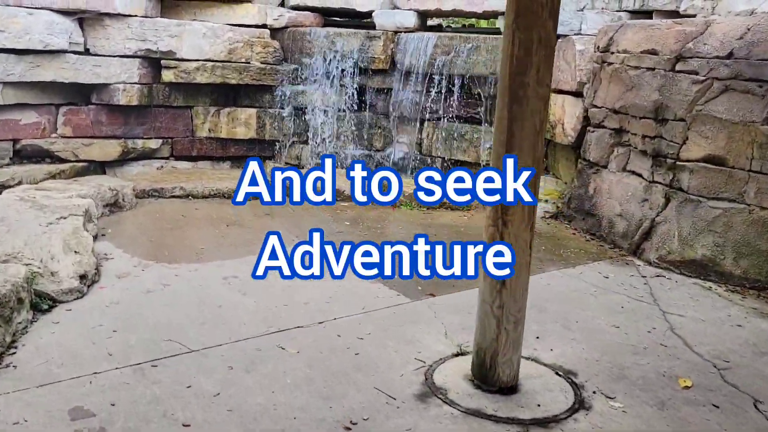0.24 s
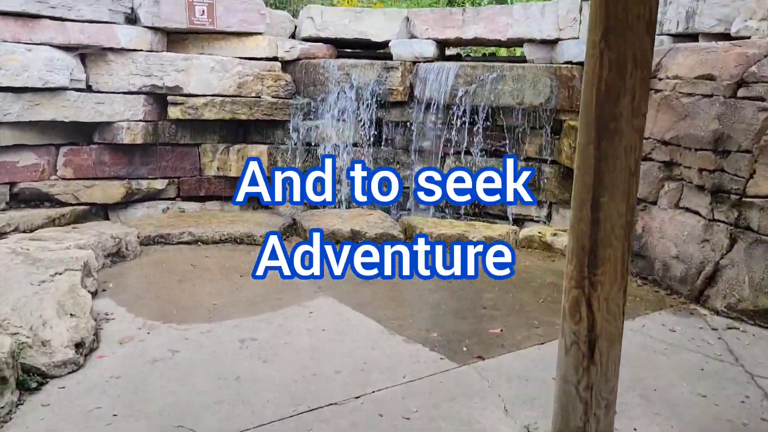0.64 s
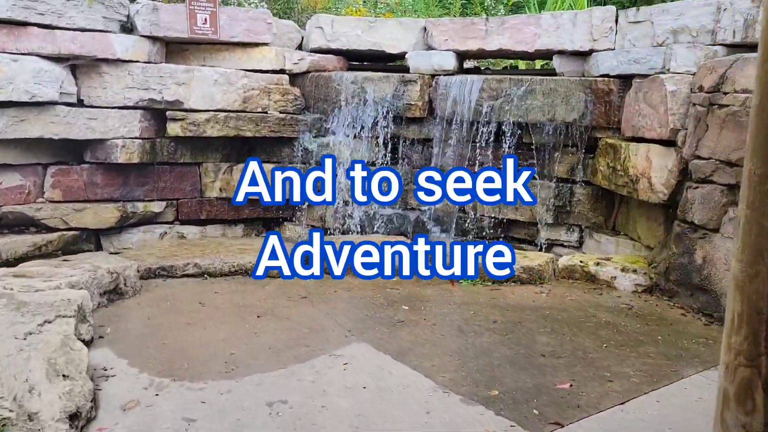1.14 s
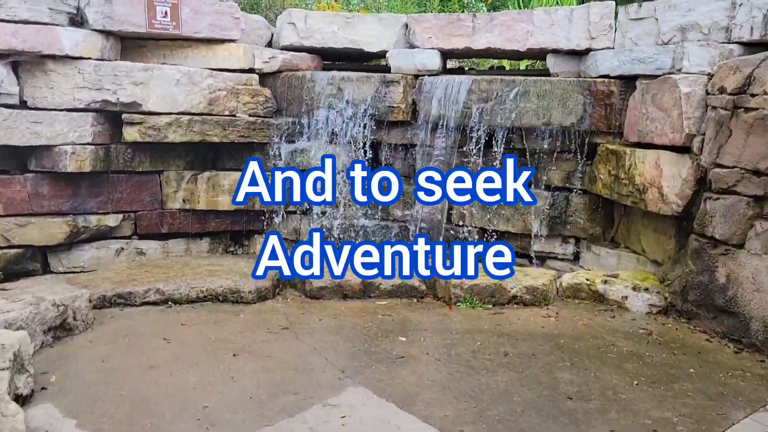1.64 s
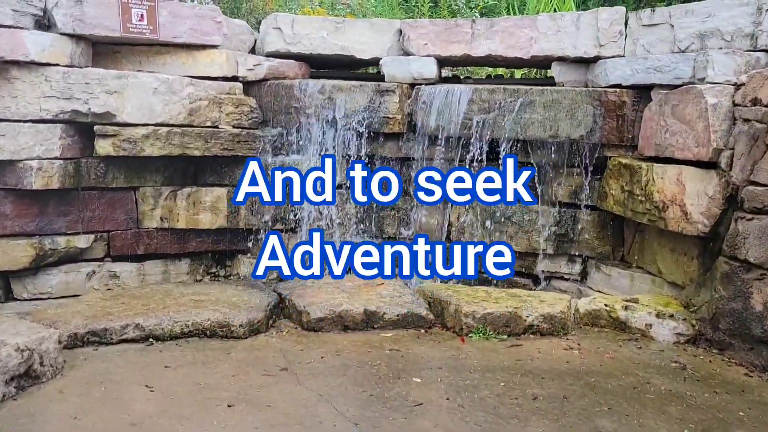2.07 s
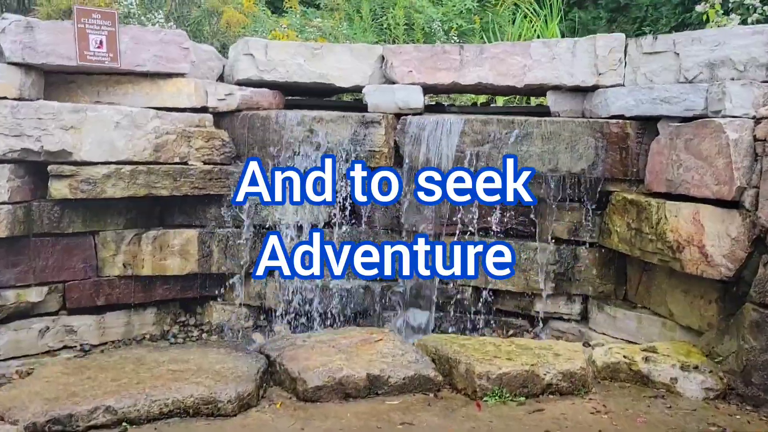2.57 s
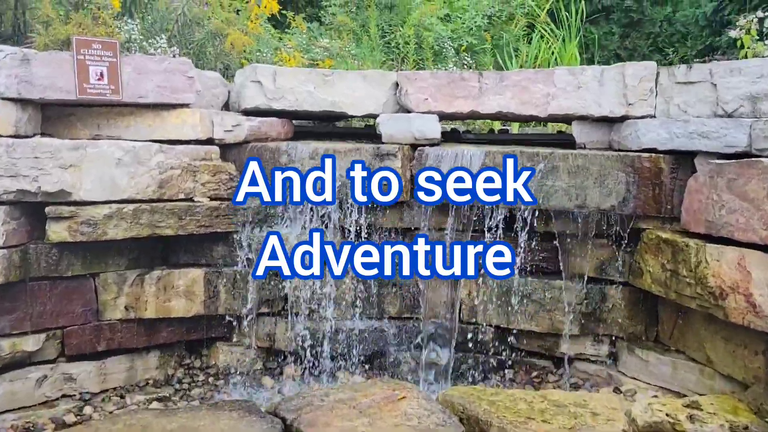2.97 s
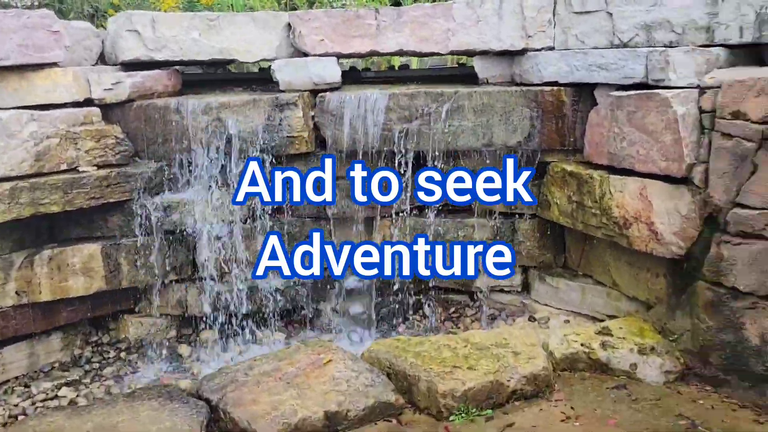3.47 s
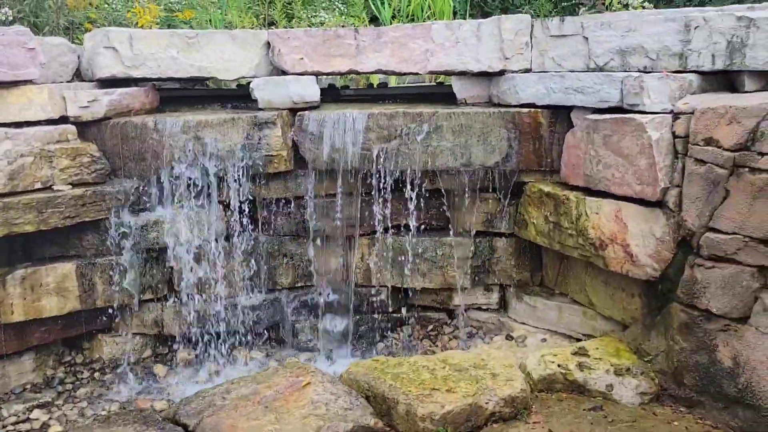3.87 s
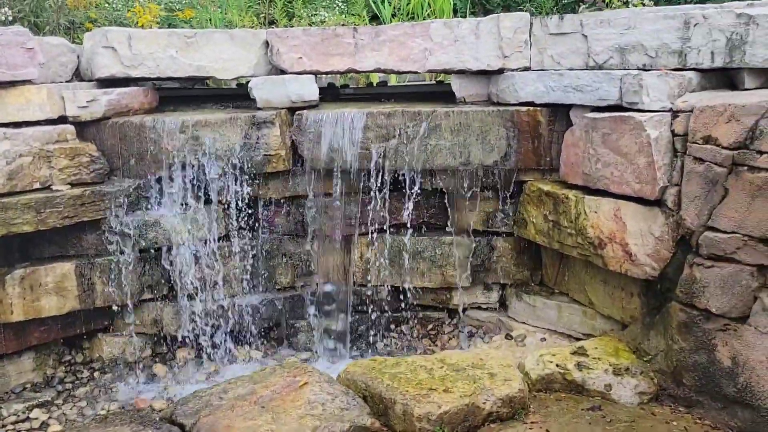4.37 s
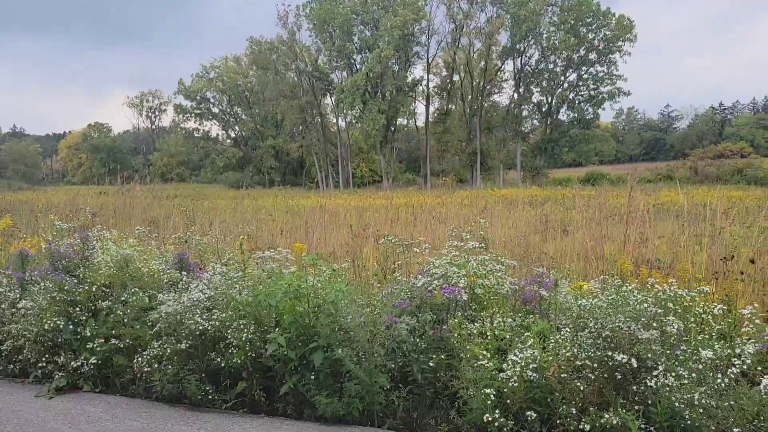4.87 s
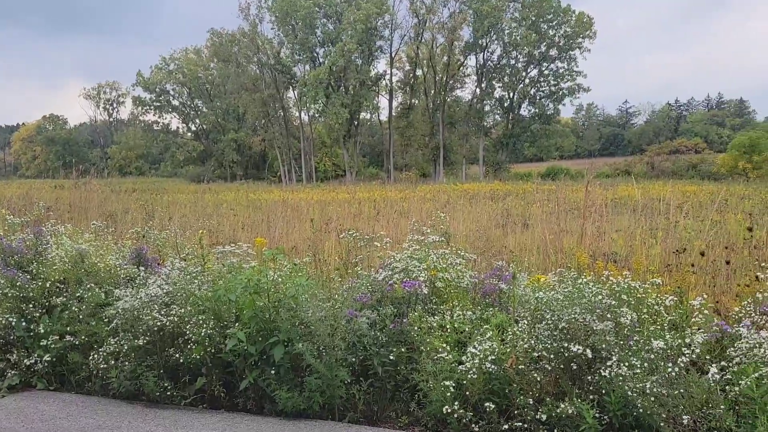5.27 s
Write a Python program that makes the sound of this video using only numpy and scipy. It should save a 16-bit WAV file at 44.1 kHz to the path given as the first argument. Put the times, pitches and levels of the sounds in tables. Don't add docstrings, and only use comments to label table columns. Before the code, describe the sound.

A small waterfall splashes and gurgles on rock, growing nearer, before an abrupt change to faint traffic rumble, insect trills and distant birds.

```python
import sys
import numpy as np
from scipy import signal
from scipy.fft import rfft, irfft, next_fast_len
from scipy.io import wavfile

SR = 44100
rng = np.random.default_rng(int(sys.argv[2]) if len(sys.argv) > 2 else 0)


def generate_wav(sig):
    pcm = np.round(np.clip(np.atleast_2d(sig).T, -1, 1) * 32767).astype(np.int16)
    wavfile.write(sys.argv[1], SR, pcm)


def linear_from_db(decibels):
    return 10 ** (np.asarray(decibels, float) / 20)


N = 243431
SIZE = next_fast_len(N)
HZ = np.maximum(np.arange(SIZE // 2 + 1) * SR / SIZE, 1)
TIME = np.arange(N) / SR

# time_s, gain_db, sight_of_struck_rocks_db
APPROACH = [(0, 0, 0.5), (1.0, -0.5, 1.6), (2.0, 0.8, 1), (2.6, 1.5, 1.6), (3.05, 2.5, -0.5), (3.4, 3, 0.5),
            (3.9, 2, 1.1), (4.2, 3.5, -0.5), (4.5, 4, -0.6)]
SHOE_SIDE_DB = -3


def rms_one(x):
    return x / np.sqrt(np.mean(x ** 2) + 1e-20)


def in_time(rows):
    s, *columns = np.transpose(rows)
    return [np.interp(TIME, s, c) for c in columns]


def at_hz(points, hz=HZ):
    table_hz, table_db = np.transpose(points)
    return np.interp(np.log(hz), np.log(table_hz), table_db)


def sides(pan_db):
    return linear_from_db(np.multiply.outer([.5, -.5], pan_db))


def shaped(x, gain):
    return irfft(rfft(x, SIZE) * gain, SIZE)[..., :N]


def peak(hz, width_hz):
    return 1 / (1 + (2 * (HZ - hz) / width_hz) ** 2)


def drift(rate_hz):
    r = np.exp(-80 * np.pi * rate_hz / SR)
    slow = signal.lfilter([1], [1, -2 * r, r * r], rng.standard_normal(N // 40 + 2002))[2000:]
    return np.interp(np.arange(N) / 40, np.arange(len(slow)), rms_one(slow))


def arrivals(count, size_db, lag_ms, spread_ms, focus):
    when, where, spot, size, sign = rng.random((5, count))
    spot_lag_ms = lag_ms + .2 * (where - .5)
    wide_lag_ms = spread_ms * (2 * where - 1)
    lag = np.where(spot < focus, spot_lag_ms, wide_lag_ms) * SR / 1000
    heights = linear_from_db(-size_db * np.log(size + 0.0083)) * np.sign(sign - .5)
    at = when * N + np.array([lag / 2, -lag / 2])
    return rms_one(np.array([np.bincount(np.clip(a, 0, N - 1).astype(int), heights, N) for a in at]))


def bubbles(size_db, cycles):
    out = np.zeros((2, N))
    for hz in np.geomspace(500, 4000, 30):
        r, w = linear_from_db(-60 * hz / (cycles * SR)), 2 * np.pi * hz / SR
        births = arrivals(count=90, size_db=size_db, lag_ms=-0.39, spread_ms=0.39, focus=.2)
        out += hz * signal.lfilter([0, np.sin(w)], [1, -2 * r * np.cos(w), r * r], births + 1e-18)
    return rms_one(out)


def alcove(fall):
    # centre_hz, width_hz, share_added
    resonances = [(1550, 400, -.1), (2200, 700, -0.28), (3000, 500, -0.0083), (3750, 500, -0.26),
                  (5500, 500, 0.23), (6150, 400, 0.081), (6850, 350, -0.26)]
    from_s, full_s = 2.6, 4.2
    inside = np.clip((TIME - from_s) / (full_s - from_s), 0, 1)
    gain = sum(share * peak(hz, width_hz) for hz, width_hz, share in resonances)
    return fall + inside * shaped(fall, gain)


def waterfall():
    zones_hz = [550, 1500, 3000, 5400, 10000]
    zone_follows = [0.3, 0.51, 0.77, 1.4, 0.62]
    zone_sight = [0.1, -0.86, -0.11, 0.98, 0.2]
    # freq_hz, level_db per hz
    splash = [(180, -23), (300, -15), (621, -10), (686, -7), (1070, -3), (1240, -0.5), (1520, -2.5),
              (1980, -1.5), (3890, -3), (5420, 5), (6830, -8.5), (7540, -8), (9980, -12.5), (14400, -10.5),
              (15600, -21.5)]
    # centre_hz, width_hz, left_db, right_db
    port_peaks = [(1230, 220, -1, 3), (2000, 730, -1.5, 3.5), (3230, 370, -2.5, 1), (5390, 1140, -15, -6),
                  (7270, 570, 0, 5), (13000, 2500, 4.5, 1), (448, 430, 1.6, 4.5), (9100, 3700, 2.5, -2.5)]

    near_db, sight_db = (c - c.mean() for c in in_time(APPROACH))
    drops = arrivals(count=500000, size_db=2.1, lag_ms=-.27, spread_ms=.36, focus=.33)
    colour = linear_from_db(at_hz(splash, np.minimum(HZ, 14400)))
    for hz, width_hz, left_db, right_db in port_peaks:
        colour = colour * linear_from_db(np.outer([left_db, right_db], peak(hz, width_hz)))
    spectrum = rfft(drops + linear_from_db(-15) * bubbles(size_db=1.0, cycles=55), SIZE) * colour

    surge_db = .15 * drift(5) + .6 * drift(8)
    patch_db = drift(8)
    zone_octaves = np.log2(zones_hz)
    out = 0
    for octave in np.arange(8, 14.6, .5):
        band = np.clip(1 - 2 * np.abs(np.log2(HZ) - octave), 0, 1)
        follows = np.interp(octave, zone_octaves, zone_follows)
        sees = np.interp(octave, zone_octaves, zone_sight)
        patch_db = 0.345 * patch_db + 0.19 * drift(24)
        level_db = follows * near_db + sees * sight_db + surge_db + .5 * patch_db + .35 * drift(18)
        turn_db = near_db * np.interp(octave, zone_octaves[-2:], [0.28, 0.6])
        patch = irfft(spectrum * band, SIZE)[:, :N]
        out = out + patch * linear_from_db(level_db) * sides(turn_db + .55 * drift(5))
    return linear_from_db(-25) * rms_one(alcove(out))


def lorry(noise):
    nearest_s, pass_s = 0.7, 1.0
    passing = 1 / (1 + ((TIME - nearest_s) / pass_s) ** 2)
    engine_hz = 105 + 4 * np.minimum(TIME, 1.5) + 1.5 * drift(3)
    engine = linear_from_db(-39.5 + 1.8 * drift(3)) * np.sin(2 * np.pi * np.cumsum(engine_hz) / SR)
    body = linear_from_db(-43) * rms_one(shaped(noise, peak(65, 40.5)))
    return passing * (engine + body)


def basin(noise):
    level_db = -47.5 + 2.38 * in_time(APPROACH)[0]
    return linear_from_db(level_db) * rms_one(shaped(noise[:, ::-1], peak(172, 233)))


def road():
    # freq_hz, level_db per hz
    road_spectrum = [(12, -44), (20, -20.5), (54, -2), (97, 2), (420, -14), (550, -52), (920, -120)]
    noise = arrivals(count=60000, size_db=1.0, lag_ms=0, spread_ms=0.42, focus=0.086)
    noise = noise + linear_from_db(-15) * rng.standard_normal((2, N))
    wash = rms_one(shaped(noise, linear_from_db(at_hz(road_spectrum)) * (HZ < 900) * (HZ > 15)))
    wash = linear_from_db(-39 + drift(9.9)) * wash
    return (wash + lorry(noise) + basin(noise)) * sides(-1.05)[:, None]


def impacts():
    # peak_s, level_db, centre_hz, length_s, width_octaves
    scuffs = [(0.162, -39.5, 557, 0.038, 1.9), (0.366, -28, 1500, 0.02, 0.94),
              (0.384, -33.5, 560, 0.04, 0.42), (0.387, -28.5, 2000, 0.017, 1.6),
              (0.401, -31, 2400, 0.087, 1.95), (0.45, -26.5, 5800, 0.012, 0.52),
              (0.462, -34.5, 4800, 0.027, 0.8), (0.62, -34, 2500, .04, 1), (1.034, -37.5, 550, 0.038, 0.56),
              (1.73, -37, 4400, .04, 0.6), (0.384, -34.5, 5000, .02, 1.2), (0.389, -28, 2300, .008, 1.6),
              (0.456, -30, 6300, .022, 0.6), (3.062, -33, 1840, 0.055, 0.33), (3.645, -33, 5700, .04, 0.45),
              (1.336, -37, 4500, 0.027, 1.2), (2.046, -33, 4500, 0.076, 1.4),
              (2.15, -33.5, 518, 0.034, 0.24), (2.267, -32.5, 5070, 0.035, 0.66),
              (2.982, -32, 6000, .02, 0.8), (3.697, -27, 5700, 0.039, 0.33),
              (3.956, -25.5, 5450, 0.019, 0.54)]
    # peak_s, level_db, centre_hz, length_s
    splats = [(0.047, -40, 284, 0.029), (0.132, -36, 6000, .012), (0.386, -34, 12500, 0.026),
              (.455, -52, 8300, .016), (0.461, -40, 283, 0.053), (0.659, -40, 284, 0.038),
              (.81, -37, 12500, .02), (0.822, -30, 2000, 0.017), (.87, -35.5, 12500, .012),
              (1.1, -34, 12500, .013), (1.212, -49, 290, 0.046), (1.337, -37.5, 12500, .024),
              (1.533, -34, 12500, .013), (1.584, -39, 2000, .02), (1.714, -37, 4300, .04),
              (2.003, -33, 6000, .012), (2.023, -32, 5000, 0.02), (2.059, -44, 8300, .018),
              (2.399, -38, 3500, 0.012), (2.44, -39, 12500, .04), (2.568, -31, 6000, 0.015),
              (2.6, -42.5, 7800, .03), (2.69, -35, 6000, .019), (2.726, -33, 8300, .02),
              (2.736, -30, 4300, 0.03), (3.118, -28, 3200, .01), (3.291, -30, 4300, 0.022),
              (3.352, -28, 5400, .023), (3.616, -37, 12500, .013), (3.759, -30, 2000, 0.021),
              (4.19, -32, 12500, .013), (4.218, -33, 12500, .008), (4.318, -35, 10000, .014),
              (4.346, -36.5, 12500, .023), (4.393, -38, 6000, .03)]
    # peak_s, peak_db, centre_hz
    cracks = [(2.8954, -24, 4580), (3.1594, -14.5, 4190), (3.1894, -21, 4770), (3.4494, -22, 4380),
              (3.7594, -19, 4610), (3.7944, -23, 6010), (3.8264, -19.5, 4710), (3.8686, -18, 5550),
              (3.9144, -23.5, 4680), (4.0374, -26, 5450), (4.0794, -22, 5390), (4.2294, -22, 5260),
              (4.2694, -22, 4730), (4.3294, -21, 5560), (4.4034, -23, 5600), (4.5154, -26, 4500)]
    events = scuffs + [row + (0.6,) for row in splats]
    events = events + [(s, peak_db - 11.0, hz, .015, .5) for s, peak_db, hz in cracks]

    span, lead = 8192, 2048
    grit = arrivals(count=200000, size_db=3, lag_ms=-.3, spread_ms=.4, focus=.3)
    grit = np.pad(grit, [(0, 0), (lead, 0)], "reflect")
    out = np.zeros(grit.shape)
    grid_hz = np.maximum(np.arange(span // 2 + 1) * SR / span, 1)
    for s, level_db, hz, length_s, octaves in events:
        here = slice(int(s * SR), int(s * SR) + span)
        band = np.exp(-2 * (np.log2(grid_hz / hz) / octaves) ** 2)
        noise = rms_one(irfft(rfft(grit[:, here]) * band, span))
        rise_s = .3 * length_s
        age = np.maximum((np.arange(span) - lead) / SR + rise_s, 0) / rise_s
        out[:, here] += linear_from_db(level_db) * noise * age * np.exp(1 - age)
    return out[:, lead:] * sides(SHOE_SIDE_DB)[:, None]


def bloops():
    # peak_s, level_db, pitch_hz
    big = [
        (.11, -35, 1940),
        (.389, -28, 1675),
        (.409, -35, 2000),
        (4.13, -28, 846),
    ]
    # time_s (peak follows late_s after), peak_db, pitch_hz
    gurgles = [(0.088, -25, 1176), (0.2927, -32, 1210), (0.3627, -26, 1156), (0.4998, -39, 1360),
               (0.5921, -31, 1345), (0.6958, -32, 1300), (0.8126, -36.5, 1260), (1.0435, -27, 1270),
               (1.2346, -29, 1286), (1.2615, -26, 1242), (1.3972, -30, 1280), (1.6414, -33, 1160),
               (1.7255, -28.5, 1330), (1.8312, -29, 1160), (1.9041, -28, 1365), (2.0502, -27, 1175),
               (2.136, -27, 1250), (2.4049, -30, 1210), (2.4683, -27, 1340), (2.5014, -22.5, 1165),
               (2.5875, -31.5, 1410), (2.6468, -27, 1276), (2.689, -28, 1200), (2.7342, -23, 1230),
               (2.7781, -30, 1190), (2.9307, -32, 1190), (3.0081, -32, 1320), (3.3117, -28, 1230),
               (3.4317, -30, 1300), (3.6007, -27, 1303), (3.684, -30, 1255), (3.7404, -27.5, 1376),
               (3.7943, -35, 1300), (3.893, -25.5, 1270), (4.0866, -28.5, 1160), (4.138, -27, 1140),
               (4.2537, -29, 1290), (4.3311, -29, 1360), (4.3816, -29, 1230), (4.4767, -37, 1130)]
    late_s, gurgle_db = 0.003995, -6.5
    length_s, climb = 0.016, 0.034

    out, span = np.zeros(N), np.arange(-1000, 5000)
    age = np.clip(span / SR / length_s + .6, 0, 6)
    swell = (age * np.exp(1 - age * 1.7) * 1.7) ** 2
    for s, level_db, hz in big + [(s + late_s, db + gurgle_db, hz) for s, db, hz in gurgles]:
        tone = np.sin(2 * np.pi * hz * length_s * (age + .5 * climb * age ** 2))
        out[int(s * SR) + span] += linear_from_db(level_db) * swell * tone
    return sides(SHOE_SIDE_DB)[:, None] * [np.roll(out, 3), out]


def chorus(noise):
    # centre_hz, width_hz, level_db, pulse_hz, depth (0-1)
    bands = [
        (121, 8, -50, 12, 0.2),
        (3130, 260, -72.5, 51, 0.3),
        (6350, 380, -74.5, 43, .6),
        (7450, 150, -80.5, 50, .5),
    ]
    out = 0
    for hz, width_hz, level_db, pulse_hz, depth in bands:
        throb = 1 + np.clip(depth, 0, 1) * np.sin(2 * np.pi * pulse_hz * TIME + 1.2 * drift(1.8))
        band = rms_one(shaped(noise, peak(hz, width_hz) ** 2))
        out = out + linear_from_db(level_db) * throb * band * sides(-1.5)[:, None]
    return out


def meadow():
    # freq_hz, level_db per hz
    wash_spectrum = [(12, -62), (20, -28), (39, -10.5), (80, -8.5), (118, -8.5), (133, -9), (147, -22),
                     (177, -19), (451, -38.5), (880, -29), (1400, -32), (2600, -45.5), (3380, -84),
                     (5720, -120)]
    # freq_hz, level_db per hz
    haze_spectrum = [(1530, -42), (2600, -17), (2780, -7), (3180, 1.5), (3640, -13), (4190, -14),
                     (5610, -15.5), (6180, -5.5), (7450, -13), (8660, -28), (10400, -31.5), (12700, -21),
                     (15500, -22)]
    noise = arrivals(count=300000, size_db=0.5, lag_ms=0.34, spread_ms=0.5, focus=0.36)
    wash_gain = linear_from_db(at_hz(wash_spectrum)) * (HZ < 4000) * sides(-1.0 - 1.3 * peak(3000, 5000))
    wash = linear_from_db(-38 + 0.4 * drift(2.4)) * rms_one(shaped(noise, wash_gain))
    haze_gain = linear_from_db(at_hz(haze_spectrum)) * (HZ > 1500) * sides(-2.5 + 6 * peak(15000, 5000))
    haze = linear_from_db(-65.5) * rms_one(shaped(noise[:, ::-1], haze_gain))
    return wash + haze + chorus(noise)


def birds():
    # start_s, length_s, start_hz, end_hz, level_db
    calls = [
        (4.62, .12, 3760, 3600, -84.5),
        (4.885, .055, 3440, 3600, -82),
        (5.005, .085, 1960, 1840, -72),
        (5.13, .07, 2020, 1980, -69),
        (5.152, .053, 4370, 4360, -81),
        (5.27, .09, 930, 1250, -65),
        (5.315, .1, 1940, 1800, -69.5),
        (5.42, .09, 1000, 1300, -65),
    ]
    out = np.zeros((2, N))
    for s, length_s, start_hz, end_hz, level_db in calls:
        low = start_hz < 1500
        phase = np.clip((TIME - s) / length_s, 0, 1)
        bend = 2.0 if end_hz < start_hz else 1
        glide_hz = start_hz + (end_hz - start_hz) * phase ** bend
        arch_hz = 330 * (start_hz > 4000) * (2 * phase - 1) ** 2
        pitch_hz = (glide_hz - arch_hz) * (1 + .005 * drift(40))
        swell = np.sin(np.pi * phase) ** .5 * linear_from_db(2.2 * drift(50))
        call = swell * np.sin(2 * np.pi * np.cumsum(pitch_hz) / SR)
        out += linear_from_db(level_db + 5) * sides(-14 if low else -11)[:, None] * [np.roll(call, 16 * low), call]
    return out


def scene():
    fall_end_s, meadow_start_s = 4.5433, 4.5836
    first = np.clip((fall_end_s + .001 - TIME) / .006, 0, 1)
    second = np.clip((TIME - meadow_start_s) / .001, linear_from_db(-50), 1) * (TIME > fall_end_s)
    return first * (waterfall() + road() + impacts() + bloops()) + second * (meadow() + birds())


def roll_off(x):
    return signal.sosfilt(signal.butter(12, 15960, fs=SR, output="sos"), x)


def record(dry):
    ceiling, cutoff_hz = .36, 15800
    soft = ceiling * np.tanh(dry / ceiling)
    mix = shaped(soft, np.clip((cutoff_hz - HZ) / 60, 0, 1))
    return roll_off(mix)


dry = scene()
out = record(dry)
generate_wav(out)
```